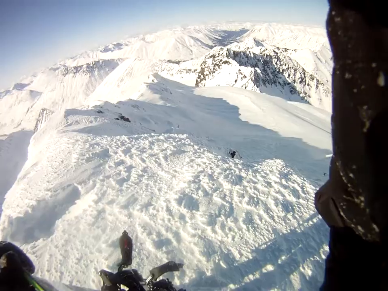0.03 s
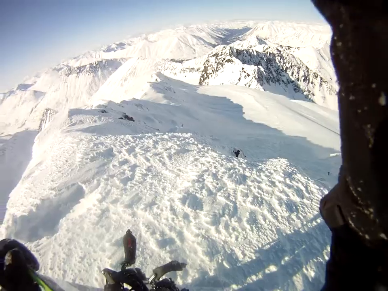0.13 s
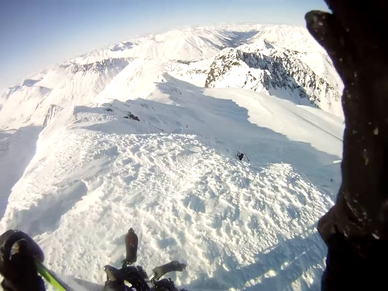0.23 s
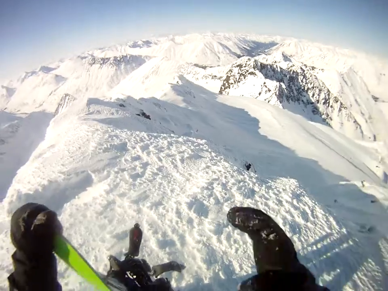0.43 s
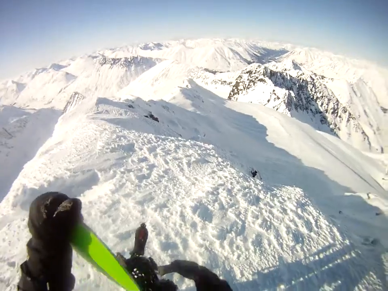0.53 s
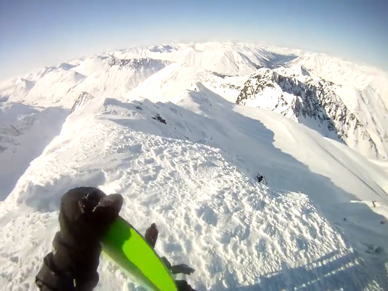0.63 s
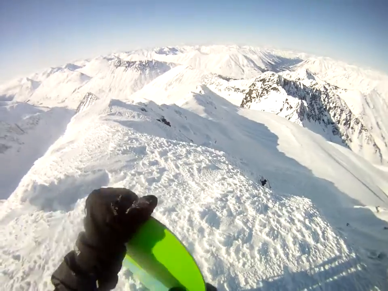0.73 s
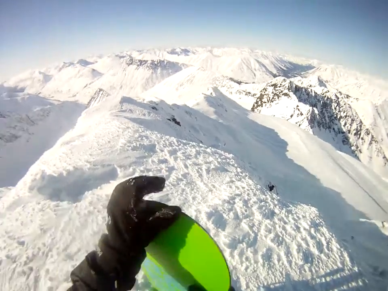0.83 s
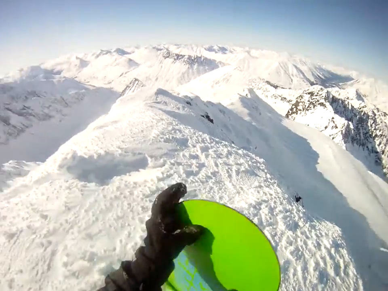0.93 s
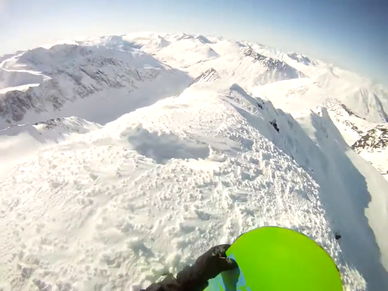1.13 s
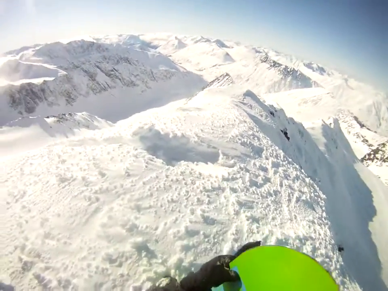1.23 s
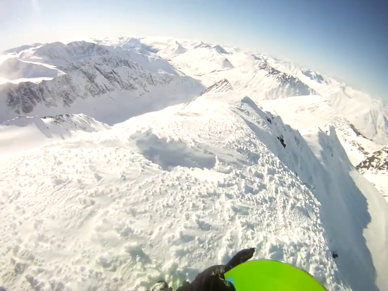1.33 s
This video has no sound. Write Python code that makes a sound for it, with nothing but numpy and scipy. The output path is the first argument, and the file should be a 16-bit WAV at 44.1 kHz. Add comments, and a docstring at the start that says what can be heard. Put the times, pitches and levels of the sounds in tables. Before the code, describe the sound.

Hard knocks rattle the plastic case around the microphone as a glove and gear bump it, with brief scraping and a low rumble. Then only a few small clicks, soft fabric rustle and faint mountain wind remain.

```python
"""Hard knocks of a gloved hand and ski gear on a helmet camera, heard from the microphone inside its case.
The quick cluster of blows rings the plastic and shakes the mount, and the glove scrapes between them.
After that the snowy summit is quiet: small ticks and rubs of gear, clothing swishing close by, light wind.
The camera overloads on the big knocks and samples coarsely, which mirrors the sound into the treble."""
import sys
import numpy as np
from scipy.fft import rfft, irfft, next_fast_len
from scipy.io import wavfile
from scipy.ndimage import map_coordinates

SR = 44100
rng = np.random.default_rng(int(sys.argv[2]) if len(sys.argv) > 2 else 0)


def dump(signal):
    """Clip the signal to [-1, 1] and save it as 16-bit WAV at the path in sys.argv[1]."""
    limited = np.clip(np.atleast_2d(signal).T, -1, 1)
    pcm = np.round(limited * 32767).astype(np.int16)
    wavfile.write(sys.argv[1], SR, pcm)


N = 61739


def amp(db):
    """Decibels to gain."""
    return 10 ** (np.asarray(db) / 20)


def unit(x):
    """Scale to rms 1."""
    return x / np.sqrt(np.mean(x ** 2) + 1e-20)


def clock():
    """The time of every sample, in seconds."""
    return np.arange(N) / SR


def curves(rows):
    """One value per sample for each column after the time."""
    times, *columns = np.transpose(rows)
    return [np.interp(clock(), times, column) for column in columns]


def filtered(x, response):
    """x through a filter whose gain is response(hz)."""
    size = next_fast_len(len(x) + 8192)
    return irfft(rfft(x, size) * response(np.fft.rfftfreq(size, 1 / SR)), size)[:len(x)]


def coloured(x, tone):
    """x shaped by a spectrum of (Hz, dB) points, at rms 1."""
    points_hz, db = np.transpose(tone)
    return unit(filtered(x, lambda hz: amp(np.interp(np.log(hz + 1), np.log(points_hz), db))))


def band(hz, width):
    """Noise through one resonance, at rms 1."""
    resonance = lambda f: abs(f * width / (hz * hz - f * f + 1j * f * width)) ** 1.5
    return unit(filtered(rng.standard_normal(N), resonance))


def wobble(rate):
    """A smooth random curve, rate knots a second."""
    return map_coordinates(rng.standard_normal(int(N * rate / SR) + 4), [clock() * rate])


def swell(s, spread):
    """A smooth rise and fall around second s."""
    return np.exp(-((clock() - s) / spread) ** 2)


def ring(t, hz, t60):
    """One damped mode, falling 60 dB in t60 seconds."""
    return np.sin(2 * np.pi * hz * t) * amp(-60 * t / t60)


def knocks(scatter_db=3.5, contact_s=0.00036, crack_db=-10, crack_t60=0.009):
    """Each blow, right at the microphone, cracks, rings the case, pushes its wall in and rocks the mount."""
    # Blows on the case; one that stays pressed against it rings shorter. Each row: start in seconds,
    # levels in dB of the hollow, low, middle and high ring, snap, dull push and thump, ring length factor.
    blows = [(0.1665, -40.5, -64, -30.5, -31.5, -32.5, -22, -22.5, .6),
             (.1709, 2, 18.5, 6.5, 7.5, 4, 0.5, -14.5, 0.62), (0.1926, -33, -10, 0, 3, 7.5, -29, -23, 0.54),
             (0.2264, -18.5, -19.5, -29, -42, -31, -39, -22, 0.83),
             (0.2317, -7, 2, 4.5, -11, -16, -0.5, -15, 0.85),
             (0.2429, 6, -3.5, -12, -20, -2, -9.5, -12, 0.86),
             (0.312, -26.5, -31.5, -27.5, -58, -70, -26.5, -41, 0.53),
             (1.3905, -56.5, -48.5, -67, -62, -71.5, -27, -38.5, 1.0)]
    # Centres in Hz of the hollow, low, middle and high ring and of the snap.
    ring_hz = [703, 1400, 2350, 3700, 4800]
    # Modes of the plastic case. Each row: pitch in Hz, gain in dB, base t60 in seconds.
    modes = [(430, -21, 0.0058), (661, -28.5, 0.041), (950, -23.5, .03), (1166, -14, 0.03),
             (1380, 3, 0.0094), (1632, 1.5, 0.0083), (2210, -3, 0.012), (2524, 1.5, 0.0069),
             (3580, -2.5, 0.013), (4073, 0, .007), (5060, -4, 0.0064)]
    out, t = np.zeros(N + SR), np.arange(SR // 4) / SR
    onset = 1 - np.exp(-t / contact_s)
    for s, *ring_db, push_db, thump_db, length in blows:
        force = lambda hz: amp(np.interp(np.log(hz + 1), np.log(ring_hz), ring_db))
        case = sum(force(hz) * amp(db + scatter_db * rng.standard_normal()) * ring(t, hz, t60 * length)
                   for hz, db, t60 in modes)
        crack = filtered(rng.standard_normal(len(t)), force) * amp(crack_db - 60 * t / (crack_t60 * length))
        push = amp(push_db) * ring(t, hz=220, t60=0.0069)
        thump = amp(thump_db) * ring(t, hz=85, t60=0.087)
        out[round(s * SR):][:len(t)] += (thump - push + case + crack) * onset
    return out[:N]


def ticks(grit_db=-18.5):
    """Small parts of the gear click close by: two short partials and a little grit."""
    # Each row: start in seconds, level in dB, pitch in Hz, lower partial in Hz, its relative level in dB,
    # attack and t60 in seconds.
    clicks = [(0.1048, -21.5, 4603, 3500, -4, 0.00042, 0.0042), (.1504, -6, 3580, 2644, -11, .0003, 0.0051),
              (.6212, -47.5, 2550, 2370, 3, .0005, 0.0118), (0.6612, -33, 2245, 1144, -4.5, 0.0014, 0.033),
              (0.6633, -31, 1740, 1105, -6, 0.0012, 0.015), (0.976, -25.5, 2070, 1240, -9, 0.00037, 0.012),
              (.9775, -43, 1300, 760, 0, 0.00048, 0.02)]
    out, t = np.zeros(N + SR), np.arange(SR // 10) / SR
    for s, db, hz, lower_hz, lower_db, attack, t60 in clicks:
        grit = rng.standard_normal(len(t)) * amp(grit_db - 60 * t / t60)
        tone = ring(t, hz, t60) - amp(lower_db) * ring(t, lower_hz, t60)
        out[round(s * SR):][:len(t)] += amp(db) * (tone + grit) * (1 - np.exp(-t / attack))
    return out[:N]


def scrapes(edge_s=0.002, slips_per_s=5200, slip_share=0.45):
    """The glove drags over the case in tiny slips."""
    # Strokes of the glove. Each row: start and end in seconds, first and last level in dB.
    strokes = [(0.066, 0.082, -45.5, -50), (0.083, 0.165, -56, -45.5), (.181, .192, -32, -20.5),
               (0.187, 0.211, -31, -44.5), (.213, 0.236, -38.5, -30)]
    # Spectrum of the scraping. Each row: frequency in Hz, relative level in dB.
    tone = [(100, -10), (600, -16.5), (1200, -6.5), (2000, 0.5), (2900, -1.5), (3700, -3), (4800, -13),
            (6000, -15.5)]
    t, level = clock(), np.zeros(N)
    for start, end, first_db, last_db in strokes:
        edges = np.clip(np.minimum(t - start, end - t) / edge_s + .5, 0, 1)
        level += edges * amp(np.interp(t, [start, end], [first_db, last_db]))
    slips = unit((rng.random(N) < slips_per_s / SR) * rng.standard_normal(N))
    friction = np.sqrt(slip_share) * slips + np.sqrt(1 - slip_share) * rng.standard_normal(N)
    return level * coloured(friction, tone)


def sway():
    """Low handling rumble: the mount sways while the hand is on the camera."""
    # Strength of the sway. Each row: time in seconds, level in dB.
    levels = [(.07, -44.5), (.095, -40.5), (.128, -46.5), (.162, -24.5), (.195, -18.5), (.21, -34.5),
              (.24, -30), (.28, -35), (.33, -70.5)]
    # Its spectrum. Each row: frequency in Hz, relative level in dB.
    tone = [(15, -0.5), (40, -1), (80, 3.5), (130, -16.5), (250, -22.5), (600, -47.5), (2000, -90.5)]
    return amp(curves(levels)[0]) * coloured(rng.standard_normal(N), tone)


def rubs():
    """Gear slides briefly against gear, each faint rub or squeak in one resonance."""
    # Each row: peak time in seconds, level in dB, spread in seconds, pitch and width in Hz.
    slides = [(0.322, -56.5, 0.0064, 2500, 400), (0.38, -55, 0.012, 2370, 400),
              (0.418, -58.5, 0.01, 2549, 400), (.438, -53, 0.006, 2500, 400),
              (0.468, -56, 0.0054, 2350, 400), (.565, -55.5, 0.0044, 2610, 396),
              (0.62, -53.5, .008, 2550, 402), (1.268, -57, 0.033, 164, 110),
              (1.277, -50.5, 0.037, 2114, 170)]
    return sum(amp(db) * swell(s, spread) * band(hz, width) for s, db, spread, hz, width in slides)


def swish(flutter_db=1.2, fizz_db=-11):
    """Fabric sliding near the microphone excites two resonances of the case, with a little fizz above."""
    # Movement of the clothing. Each row: time in seconds, levels in dB of the lower and upper resonance.
    movement = [(.3, -64, -67), (.45, -64.5, -67.5), (.6, -64.5, -68), (.68, -56.5, -54.5),
                (.8, -57.5, -55), (0.931, -53.5, -59.5), (1.0, -63, -61), (1.121, -60.5, -63.5),
                (1.22, -65.5, -72.5), (1.261, -61, -64.5), (1.31, -62, -69), (1.348, -74, -73),
                (1.4, -61, -76)]
    # The two resonances. Each row: centre and width in Hz.
    resonances = [(1260, 220), (2170, 420)]
    levels = curves(movement)
    body = sum(amp(db + flutter_db * wobble(45)) * band(hz, width)
               for db, (hz, width) in zip(levels, resonances))
    fizz = amp(levels[0] + fizz_db) * band(hz=3760, width=3200)
    return body + fizz


def wind(hiss_db=-60, flutter_db=1.0):
    """Light summit wind at the microphone: a soft rumble under a thin hiss."""
    # Strength of the rumble. Each row: time in seconds, level in dB.
    gusts = [(.07, -62), (.38, -59), (.7, -59.5), (.95, -54.5), (1.02, -56.5), (1.12, -54.5), (1.26, -52),
             (1.4, -54.5)]
    # Spectra of the rumble and the hiss. Each row: frequency in Hz, relative level in dB.
    rumble_tone = [(15, -2), (35, 0), (55, -5), (88, 2), (130, -16), (220, -13), (400, -27.5),
                   (1500, -68.5)]
    hiss_tone = [(100, -21), (400, -3.5), (800, -5.5), (1300, -7.5), (1800, -4), (2500, -2.5), (3100, -5.5),
                 (4000, -10.5), (5000, -9.5), (6000, -13)]
    rumble = amp(curves(gusts)[0]) * coloured(rng.standard_normal(N), rumble_tone)
    hiss = amp(hiss_db - flutter_db * wobble(35)) * coloured(rng.standard_normal(N), hiss_tone)
    return rumble + hiss


def overload(x, ceiling=0.89, knee=6):
    """The camera's input flattens peaks just under full scale."""
    return x / (1 + np.abs(x / ceiling) ** knee) ** (1 / knee)


def scene():
    """Everything reaches the one microphone inside the case."""
    return (knocks() + ticks() + scrapes() + sway() + rubs() + swish() + wind())[None]


def record(dry):
    """The camera clips, keeps a narrow band and holds each coarse sample, mirroring that band upward."""
    opens_s, band_hz, band_order, hold_hz, top_hz = 0.069, 5480, 16, 12000, 15900
    t = clock()
    driven = overload(dry[0] * (t > opens_s))
    narrow = filtered(driven, lambda hz: 1 / np.sqrt(1 + (hz / band_hz) ** (2 * band_order)))
    mirrored = narrow * (1 + 2 * np.cos(2 * np.pi * hold_hz * t))  # images either side of the hold rate
    held = filtered(mirrored, lambda hz: np.sinc(hz / hold_hz))
    top_cut = lambda hz: np.clip((top_hz - hz) / 500 + .5, 0, 1)
    return filtered(np.clip(held, -1, 1), top_cut)[None]


dry = scene()
out = record(dry)
dump(out)
```